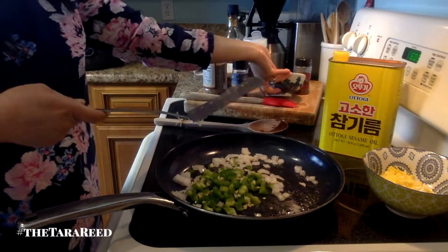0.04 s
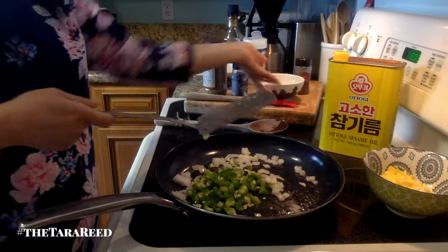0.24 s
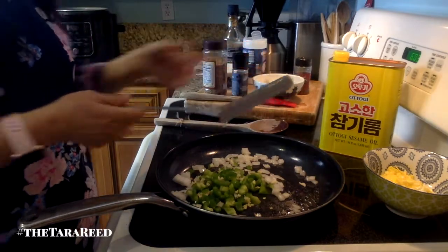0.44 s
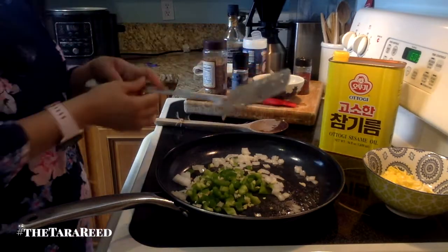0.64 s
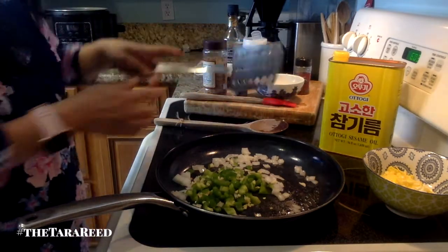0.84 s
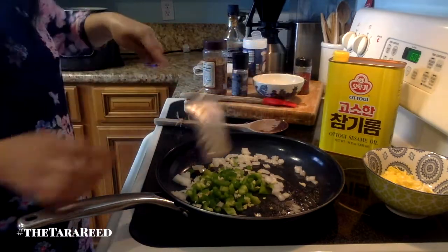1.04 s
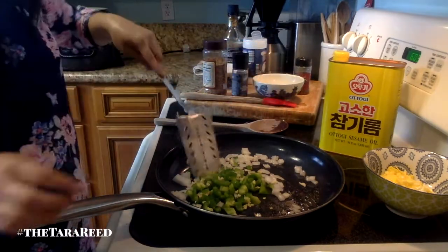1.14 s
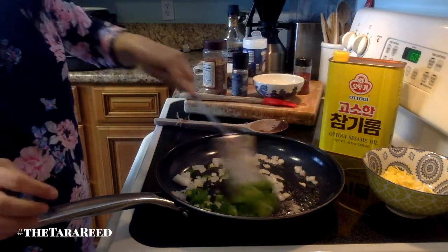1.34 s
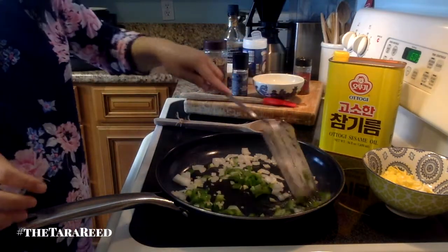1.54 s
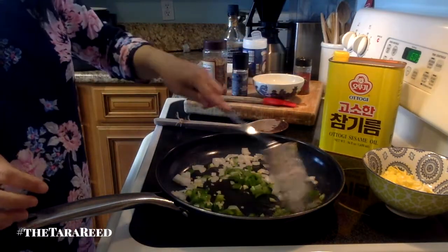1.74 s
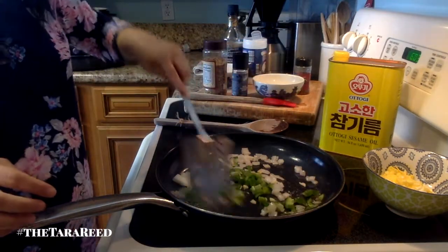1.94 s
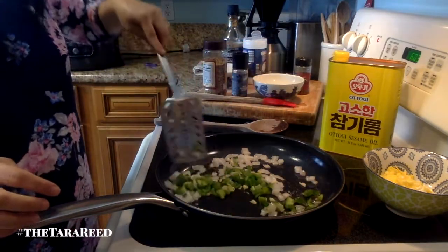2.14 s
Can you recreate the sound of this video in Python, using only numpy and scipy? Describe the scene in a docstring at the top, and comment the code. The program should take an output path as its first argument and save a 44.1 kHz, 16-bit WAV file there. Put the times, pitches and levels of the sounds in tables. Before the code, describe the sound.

A metal spatula stirs vegetables in a frying pan: after an early bowl knock on a wooden board, soft bumps, sharp clanks and a short scrape sound over gentle sizzling, close-miked in a small kitchen.

```python
"""A bowl knocks on a wooden board and rocks to rest: dense short resonances, clear modes and a room tail.
A metal spatula lands in diced vegetables with soft bumps, then strikes the frying pan in two pairs of blows
(noise bursts and ringing modes) and scrapes along it (a run of random slips driving the pan).
Hot oil spits in swelling bursts of high noise, over a gentle sizzle of hiss and fine crackles
and the low murmur of a small kitchen. The loudest knocks overload the close microphone."""
import sys
import numpy as np
from scipy import signal
from scipy.fft import rfft, irfft
from scipy.io import wavfile

SR = 44100
rng = np.random.default_rng(int(sys.argv[2]) if len(sys.argv) > 2 else 0)


def dump(signal):
    """Clip the signal to [-1, 1] and save it as 16-bit WAV at the path in sys.argv[1]."""
    limited = np.clip(np.atleast_2d(signal).T, -1, 1)
    pcm = np.round(limited * 32767).astype(np.int16)
    wavfile.write(sys.argv[1], SR, pcm)


N = 97020
TIME = np.arange(N) / SR
RING_TIME = TIME[:32768]   # time axis of every single event
BUMP_ROOM_DB = -17

# spectrum of a low thump through the stove: f/Hz, density/dB
THUMP_SPECTRUM = [(30, -30.5), (70, -21.5), (110, -10), (148, 5), (195, -8.5), (250, -9.5), (400, -21),
                  (900, -46.5)]
THUMP_T60_S = .11
# modes of pan and blade: f/Hz, level/dB, t60/s
PAN_RESONANCES = [(1275, -4, .14), (1443, -7, .22), (2150, -2, .13), (2600, -5, .13), (3475, 6, .095),
                  (3830, 3, .08), (4400, 2, .09), (4750, 1, .09), (5090, 0, .1), (6080, -12, .09),
                  (6980, -14, .09), (8210, -16, .1), (10000, -7, .06), (12400, -2, .05)]


def from_db(db):
    """Decibels to gain."""
    return 10 ** (np.asarray(db) / 20)


def at_hz(points, hz):
    """Read a table on a log-frequency axis."""
    f, v = np.transpose(points)
    return np.interp(np.log(np.maximum(hz, 1)), np.log(f), v)


def rms_one(x):
    """Scale to unit power."""
    return x / np.sqrt(np.mean(x ** 2) + 1e-20)


def white(size=len(RING_TIME)):
    """Noise from many equal partials of random phase; unit power."""
    phases = 2 * np.pi * rng.random(size // 2 + 1)
    return rms_one(irfft(np.exp(1j * phases), size))


def dying(t60):
    """A decay of 60 dB in t60 seconds."""
    return np.exp(-np.log(1000) * RING_TIME / t60)


def coloured(x, colour):
    """A causal (minimum-phase) filter with the given spectrum; keeps the power of white noise."""
    hz = np.fft.rfftfreq(len(x), 1 / SR)
    cepstrum = irfft(np.log(from_db(at_hz(colour, hz))), len(x))
    # folding the cepstrum onto positive times makes the phase minimal
    cepstrum[1:len(x) // 2] *= 2
    cepstrum[len(x) // 2 + 1:] = 0
    response = np.exp(rfft(cepstrum))
    power = np.mean(abs(response) ** 2)
    return irfft(rfft(x) * response / np.sqrt(power), len(x))


def low_pass(x, order, cut_hz):
    """Butterworth treble cut."""
    return signal.sosfilt(signal.butter(order, cut_hz, fs=SR, output="sos"), x)


def through(x, response):
    """Drive a body or room, given by its response scaled to unit energy."""
    return signal.fftconvolve(x, response / np.linalg.norm(response))[:N]


def add(out, s, sound):
    """Mix a sound in at a time in seconds."""
    i = int(s * SR)
    out[i:i + len(sound)] += sound[:N - i]


def room_tail():
    """The kitchen's answer to a blow: builds up, then each octave dies at its own rate."""
    # reverberation time of the kitchen: f/Hz, t60/s
    kitchen_t60 = [(60, .36), (250, 0.39), (600, .3), (1100, 0.33), (2000, 0.27), (4000, 0.22), (8000, .2),
                   (15000, 0.14)]
    build_s = .006
    spectrum = rfft(white())
    hz = np.fft.rfftfreq(len(RING_TIME), 1 / SR)
    octave = np.round(np.log2(np.clip(hz, 64, 16384)))
    tail = np.zeros(len(RING_TIME))
    for k in np.unique(octave):
        band = irfft(spectrum * (octave == k))
        tail += band * dying(at_hz(kitchen_t60, 2 ** k))
    return tail * (1 - np.exp(-RING_TIME / build_s))


def knock(colour, t60, room_db):
    """Dense short resonances of a struck body, and the room after them."""
    body = white() * dying(t60)
    return coloured(body + from_db(room_db) * room_tail(), colour)


def ring(modes):
    """The clear modes of a body, each struck with a slightly different strength and a random sign."""
    out = np.zeros(len(RING_TIME))
    for hz, db, t60 in modes:
        strength = from_db(db + rng.standard_normal()) * rng.choice([-1, 1])
        out += strength * np.sin(2 * np.pi * hz * RING_TIME) * dying(t60)
    return out


def bowl():
    """A dull, ringing knock on the board and smaller ones as the bowl rocks to rest."""
    # contacts of bowl and board: t/s, level/dB
    contacts = [(0.2192, 0), (0.2222, -4.5), (0.2277, -5), (0.2499, -28), (0.2656, -10), (0.2985, -18.5)]
    # clear modes of bowl and board: f/Hz, level/dB, t60/s
    bowl_modes = [(150, -7, .28), (172, -9, .26), (560, -5, .2), (688, 0, .21), (716, 0, .23),
                  (926, -3, .26), (1016, -5, .33), (1076, -3, .35), (1140, -1, .38), (1217, 0, .36),
                  (1248, -3, .34), (1525, 3, .2), (1637, -3, .22), (2360, 3, .18), (2795, -3, .2)]
    # spectrum of their dense, short-lived resonances: f/Hz, density/dB
    bowl_spectrum = [(30, -24), (70, -18.5), (140, -4), (210, -8), (290, -8), (390, -16), (470, -9),
                     (700, 3), (820, -6), (950, 0), (1200, 2), (1360, -5), (1520, 4.5), (1750, -3.5),
                     (2000, 1), (2230, -7), (2370, -2), (2620, -8), (2820, -6), (3250, -24.5),
                     (4200, -49.5)]
    t60_s, room_db, ring_db, cut_hz = .05, -13, -19.5, 3600
    out = np.zeros(N)
    for s, db in contacts:
        body = knock(bowl_spectrum, t60_s, room_db)
        add(out, s, from_db(db) * (body + from_db(ring_db) * ring(bowl_modes)))
    return low_pass(out, 6, cut_hz)


def pan_hits():
    """Metal on the pan, damped by the food: clank, clunk and thump, with a treble cut-off for each clank."""
    # blows of the blade: t/s, clank level/dB, clank cut-off f/Hz, clunk f/Hz, clunk level/dB, thump level/dB
    blows = [(1.2617, -3, 13600, 871, -14, -26), (1.3038, -19.5, 7100, 917, -24, -41),
             (1.8627, -7.5, 5220, 951, -9.5, -27), (1.879, -10, 7400, 940, -18.5, -37.5)]
    # spectrum of the dense resonances of the pan: f/Hz, density/dB
    pan_spectrum = [(30, -35), (130, -4), (280, 0), (600, -3.5), (950, -2), (2300, 3), (3050, -7),
                    (3600, 8.5), (4150, -2.5), (4600, 1.5), (5200, 1), (5700, -7), (9000, -11),
                    (12500, -6.5), (15500, -33.5)]
    t60_s, room_db, ring_db, clunk_t60_s = 0.062, -13, -15, 0.092
    out = np.zeros(N)
    for s, db, cut_hz, clunk_hz, clunk_db, thump_db in blows:
        blow = knock(pan_spectrum, t60_s, room_db) + from_db(ring_db) * ring(PAN_RESONANCES)
        clank = from_db(db) * low_pass(blow, 4, cut_hz)
        clunk = ring([(clunk_hz, clunk_db, clunk_t60_s)])
        thump = from_db(thump_db) * knock(THUMP_SPECTRUM, THUMP_T60_S, BUMP_ROOM_DB)
        add(out, s, clank + clunk + thump)
    return out


def scrape():
    """The blade slips densely along the pan: a rasp and ringing modes, with a low hum from its start."""
    # spectrum of the scraping force: f/Hz, density/dB
    scrape_spectrum = [(50, -40), (130, -5.5), (260, 1), (500, -11), (1400, -4), (2500, 2.5), (3050, -4),
                       (3500, -3), (4900, 3.5), (5650, -44.5), (7000, -5.5), (7700, -49), (8300, -1.5),
                       (9200, -23.5), (15000, -14.5)]
    # hum of the whole pan on the stove, set off by dragging the blade: f/Hz, level/dB, t60/s
    hum_modes = [(246, -29.5, 0.45)]
    start_s, end_s, attack_s, release_s = 1.880, 1.945, .004, 0.0051   # release: fall to 1/e
    slips_per_s, slip_spread_db = 1500, 2
    rasp_db, ring_db, room_db = -23, -29.5, -18

    attack = np.clip((TIME - start_s) / attack_s, 0, 1)
    release = np.exp(-np.maximum(TIME - end_s, 0) / release_s)
    sizes = from_db(slip_spread_db * rng.standard_normal(N)) * rng.choice([-1, 1], N)
    slips = sizes * (rng.random(N) < slips_per_s / SR)
    force = coloured(rms_one(slips) * attack * release, scrape_spectrum)

    rasp = through(force, white() * dying(0.036))
    ringing = through(force, ring(PAN_RESONANCES))
    direct = from_db(rasp_db) * rasp + from_db(ring_db) * ringing
    add(direct, start_s, ring(hum_modes))
    return direct + from_db(room_db) * through(direct, room_tail())


def bumps():
    """Soft contacts, strong as the spatula lands in the vegetables: a low thump and a short chop."""
    # soft contacts at the stove: t/s, thump level/dB, chop level/dB
    contacts = [(0.003, -35.5, -39.5), (0.134, -45, -71.5), (1.153, -24, -56.5), (1.1614, -25.5, -24),
                (1.194, -31, -39), (1.238, -34.5, -74.5)]
    # spectrum of the chop: f/Hz, density/dB
    chop_spectrum = [(200, -5.5), (400, -10), (620, 2.5), (880, 3.5), (1250, -8), (1650, -2.5),
                     (2700, -5.5), (3200, -23.5), (6000, -44)]
    chop_t60_s = .06
    out = np.zeros(N)
    for s, thump_db, chop_db in contacts:
        thump = from_db(thump_db) * knock(THUMP_SPECTRUM, THUMP_T60_S, BUMP_ROOM_DB)
        chop = from_db(chop_db) * knock(chop_spectrum, chop_t60_s, BUMP_ROOM_DB)
        add(out, s, thump + chop)
    return out


def spits():
    """Each drop of water swells and bursts in the oil with a high, short fizz; a slower swell dies more slowly."""
    # bursting drops: t/s, level/dB, f/Hz, swell/s
    drops = [(0.060, -37, 14880, 0.0045), (0.126, -34, 14200, 0.0021), (0.7435, -29.5, 11500, 0.0022),
             (1.1752, -26, 14200, .002), (1.204, -37, 12800, 0.0022), (1.358, -25.5, 12000, 0.0027),
             (1.499, -30, 12500, 0.0021), (1.569, -8.5, 13100, 0.0013), (1.7429, -37, 14800, .003),
             (1.7596, -27, 15080, 0.0029), (1.8482, -32.5, 14200, 0.0013), (1.903, -11, 12240, 0.0024),
             (1.9645, -34, 12800, .002), (2.005, -28.5, 14700, 0.0022), (2.0595, -28.5, 14100, .003),
             (2.1, -31.5, 13900, 0.0024)]
    # spectrum of a spit: multiple of its pitch, density/dB
    spit_spectrum = [(.03, -40.5), (.1, -28.5), (.145, -15.5), (.2, -20), (.35, -21), (.44, -17.5),
                     (0.521, -26.5), (.65, -19), (.82, -20), (0.931, -0.5), (1, -1), (1.1, -6),
                     (1.3, -15.5)]
    t60_swells, room_db, tail_t60_s = 11, -16, 0.12   # the burst's t60 counts in swell times
    out = np.zeros(N)
    for s, db, pitch_hz, swell_s in drops:
        swell = np.minimum(RING_TIME / swell_s, 1) ** 2
        swells_since_peak = np.maximum(RING_TIME / swell_s - 1, 0)
        burst = np.exp(-np.log(1000) * swells_since_peak / t60_swells)
        fizz = white() * swell * (burst + from_db(room_db) * dying(tail_t60_s))
        colour = [(multiple * pitch_hz, level) for multiple, level in spit_spectrum]
        add(out, s, from_db(db) * coloured(fizz, colour))
    return out


def sizzle():
    """Countless tiny bubbles in the oil: a hiss with fine crackles on it."""
    # vigour of the frying: t/s, level/dB
    vigour_curve = [(0, -40.5), (.35, -40.5), (.7, -41.5), (1.08, -45), (1.21, -41), (1.38, -40.5),
                    (1.65, -41), (1.82, -42.5), (2.06, -41), (2.2, -40)]
    # spectrum of the sizzle: f/Hz, density/dB
    sizzle_spectrum = [(400, -22), (900, -14), (1450, -16.5), (2330, -5.5), (3000, -9.5), (3500, -2.5),
                       (4900, -5), (6000, -10), (8200, -9), (11400, -4), (12800, -5.5), (14400, -3),
                       (15800, -5)]
    crackles_per_s, spread_db, crackle_db, hiss_db = 2700, 5.5, -6, -0.5
    # mostly small crackles, a few much louder
    sizes_db = spread_db * np.minimum(rng.exponential(1, N), 5)
    sizes = from_db(sizes_db) * rng.choice([-1, 1], N)
    clicks = sizes * (rng.random(N) < crackles_per_s / SR)
    crackle = rms_one(signal.fftconvolve(clicks, white() * dying(0.0053))[:N])
    vigour = from_db(np.interp(TIME, *np.transpose(vigour_curve)))
    mix = from_db(crackle_db) * crackle + from_db(hiss_db) * white(N)
    return vigour * coloured(mix, sizzle_spectrum)


def rumble():
    """Low murmur of the stove and room: steady filtered noise."""
    # spectrum of the murmur: f/Hz, density/dB
    rumble_spectrum = [(25, -25), (50, -12), (100, -2.5), (150, 0), (210, -5.5), (300, 1.5), (450, -13),
                       (1000, -20)]
    return from_db(-63.5) * coloured(white(N), rumble_spectrum)


def scene():
    """Everything at the stove, heard by one microphone."""
    return (bowl() + pan_hits() + scrape() + bumps() + spits() + sizzle() + rumble())[None]


def record(dry):
    """The loudest peaks clip at the overload level, then the top is cut steeply."""
    overload, cutoff_hz = 0.85, 16000   # overload: fraction of full scale
    top_cut = signal.ellip(10, .1, 70, cutoff_hz, fs=SR, output="sos")
    return signal.sosfilt(top_cut, np.clip(dry, -overload, overload))


dry = scene()
out = record(dry)
dump(out)
```